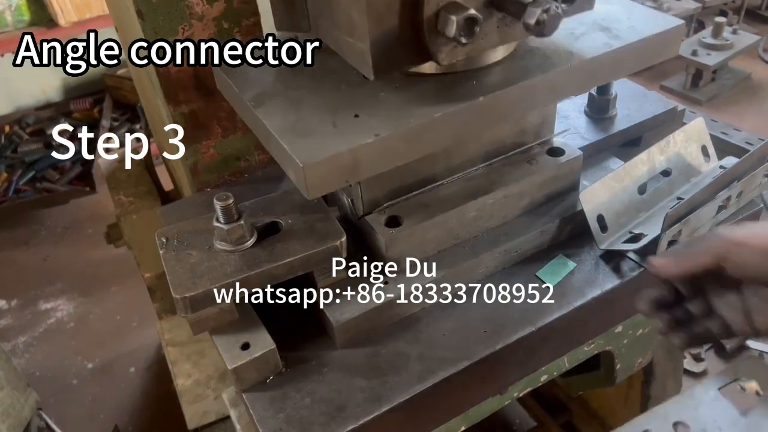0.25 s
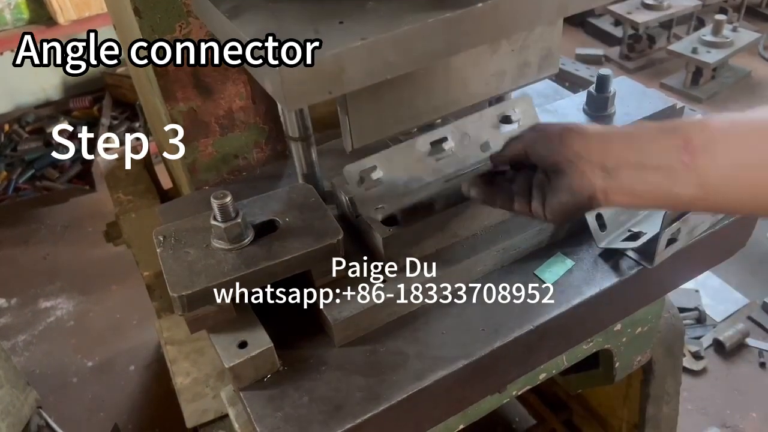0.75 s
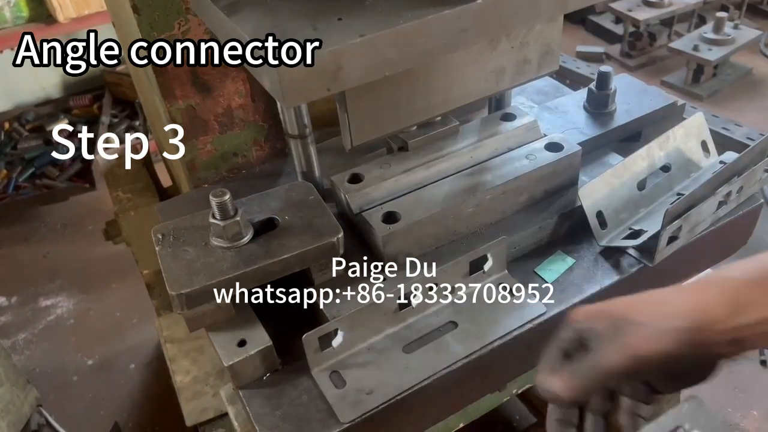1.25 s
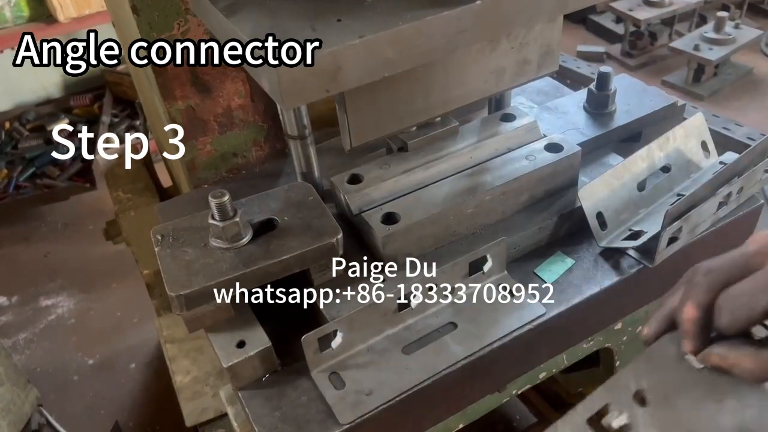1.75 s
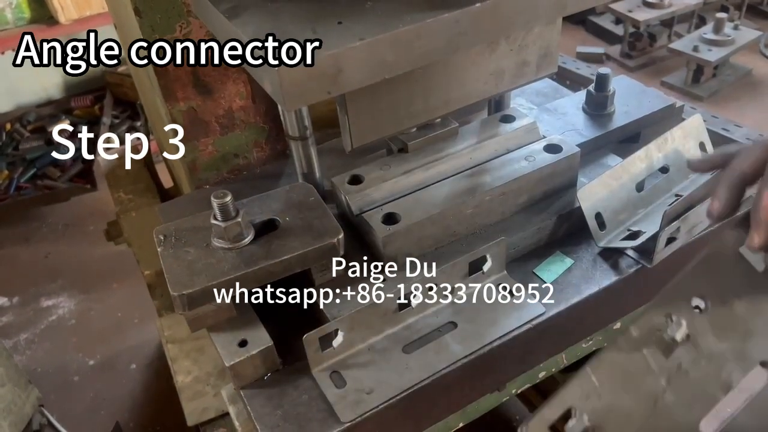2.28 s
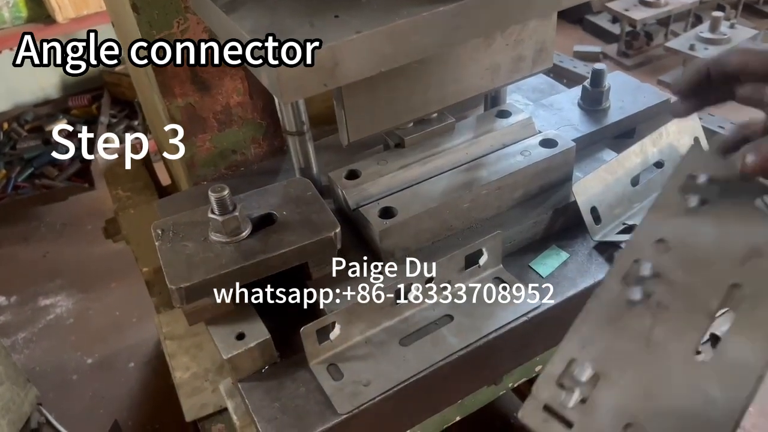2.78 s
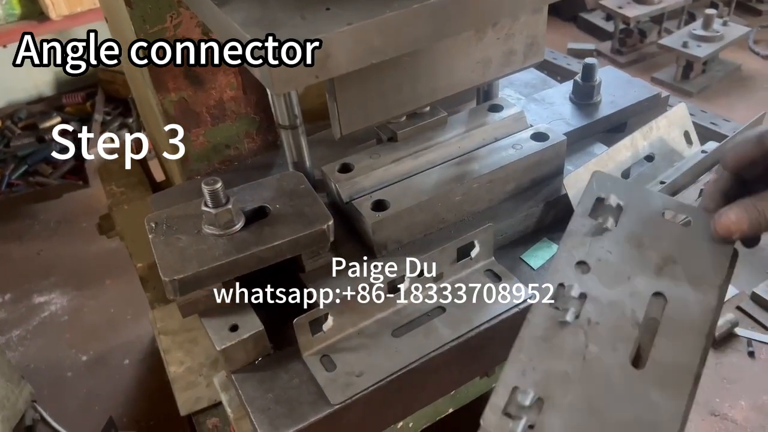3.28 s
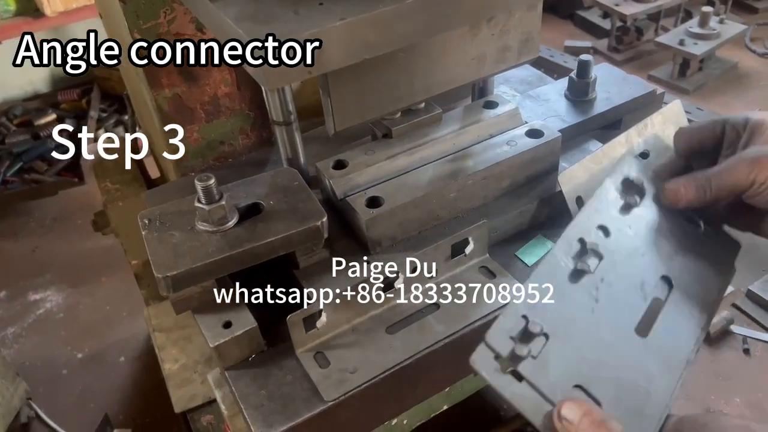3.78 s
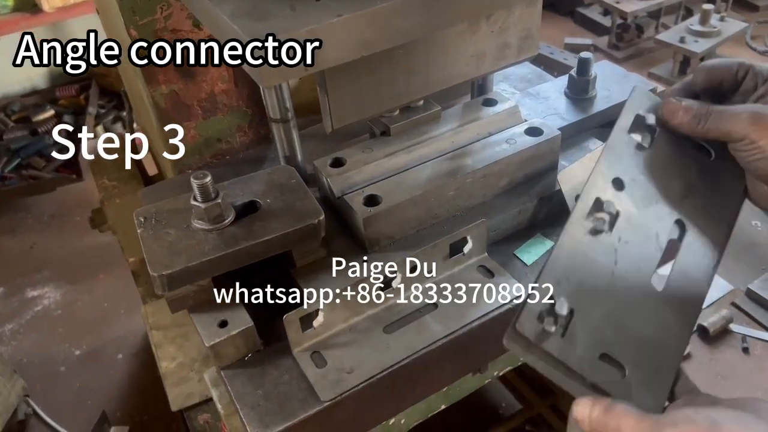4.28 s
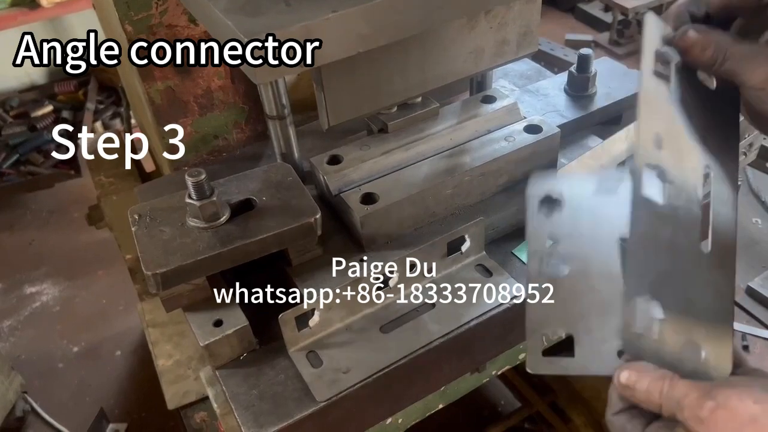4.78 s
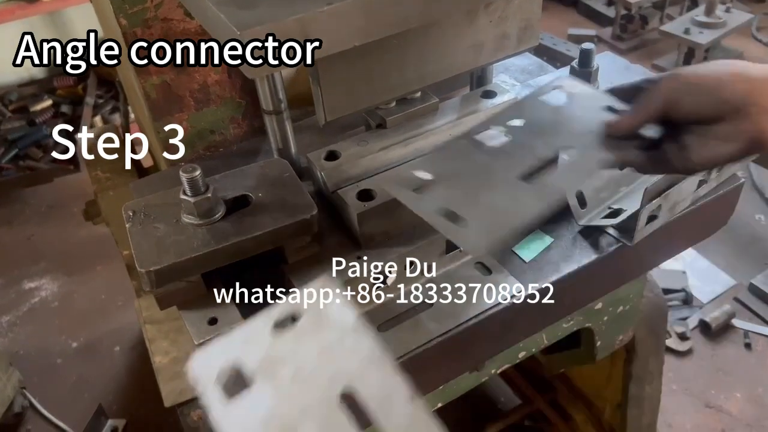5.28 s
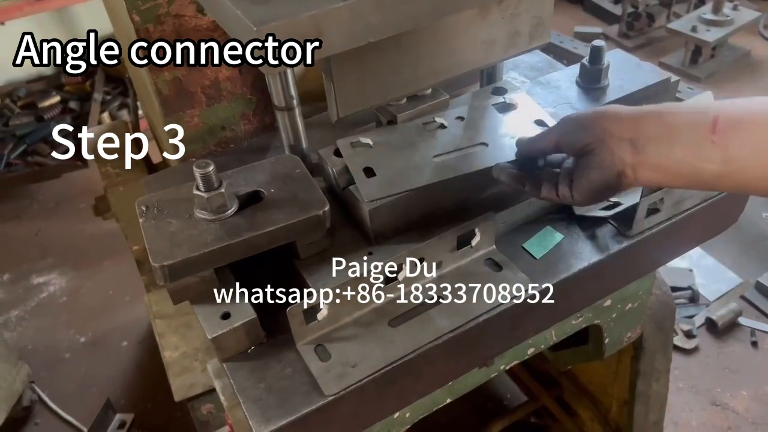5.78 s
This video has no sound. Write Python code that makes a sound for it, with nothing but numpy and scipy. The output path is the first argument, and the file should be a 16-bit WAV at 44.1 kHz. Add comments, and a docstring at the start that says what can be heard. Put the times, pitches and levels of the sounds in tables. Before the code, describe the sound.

Close to a punch press in a workshop, heavy thuds and steel cracks come first in quick succession as the ram opens. A bent part clinks sharply as it is set down. Then only irregular hollow gear knocks continue over motor hum and dull hall noise, with a few faint clinks, until a steel blank drops on the die, rattles, and scrapes briefly amid busier knocking.

```python
"""Idling punch press

A punch press idles in a workshop: loose gear teeth knock irregularly in its drive over motor hum and hall noise.
The ram thuds open, a bent part is lifted out and set down, and a steel blank is turned in the hands,
then dropped on the die and slid into place. Two spaced microphones listen close by.
Knocks, thuds and clinks are sums of dying tones; bangs, cracks, rubbing and hall are shaped noise;
the motor and some passing tones are wavering sines."""
import sys
import numpy as np
from scipy import signal
from scipy.fft import rfft, irfft
from scipy.io import wavfile
from scipy.ndimage import uniform_filter1d

SR = 44100
rng = np.random.default_rng(int(sys.argv[2]) if len(sys.argv) > 2 else 0)


def inscribe(sig):
    """Save sig as 16-bit PCM at rate SR to the path in sys.argv[1].

    A 1-D sig is mono; a 2-D sig holds one channel per row.
    Samples are clipped to [-1, 1] before scaling.
    """
    pcm = np.round(np.clip(np.atleast_2d(sig).T, -1, 1) * 32767)
    wavfile.write(sys.argv[1], SR, pcm.astype(np.int16))


N = 266364  # length in samples

# each microphone's share of a left-right difference: left, right
SIDES = np.array([[.5], [-.5]])
FLUTTER_DB, FLUTTER_PER_S = 3, 160  # struck modes flutter in level


def gain_of(db):
    """Turns decibels into a factor on the wave."""
    return 10 ** (np.asarray(db) / 20)


def evened(x):
    """Scales a sound to an rms of 1."""
    return x / np.sqrt(np.mean(x ** 2) + 1e-20)


def read(points, hz):
    """Reads a curve between its listed points, along a logarithmic frequency scale."""
    f, value = np.transpose(points)
    return np.interp(np.log(hz + 1), np.log(f + 1), value)


def add(mix, s, sound):
    """Adds a stereo sound to the mix from second s on, cut off at the end."""
    part = mix[:, round(s * SR):][:, :sound.shape[1]]
    part += sound[:, :part.shape[1]]


def coloured(x, db_of):
    """Filters x by a gain in dB given as a function of frequency."""
    hz = np.fft.rfftfreq(x.shape[-1], 1 / SR)
    return irfft(rfft(x) * gain_of(db_of(hz)), x.shape[-1])


def wander(rate):
    """A random line through normally spread points, rate of them per second."""
    points = int(N / SR * rate) + 2
    return np.interp(np.linspace(0, points - 1, N), np.arange(points), rng.standard_normal(points))


def jagged(hz, depth_db, width):
    """The dense overtones of sheet steel: a random comb of peaks about width Hz wide."""
    points = rng.standard_normal(int(SR / 2 / width) + 2)
    return depth_db * np.interp(hz / width, np.arange(len(points)), points)


def mode(push, hz, t60):
    """One complex resonance: a unit click leaves a ring of height 1."""
    step = (2j * np.pi * hz - np.log(1000) / t60) / SR
    return signal.lfilter([1], [1, -np.exp(step)], push)


def apart(x, other, lag, share):
    """The right microphone hears x lag samples later; reflections add a share of unrelated sound."""
    share = np.clip(share, 0, 1)
    right = np.sqrt(1 - share ** 2) * np.roll(x, lag) + share * other
    return np.array([x, right])


def struck(modes, stretch, rise, spacing_hz, flutter_db):
    """A blow on an object: each mode starts at its own phase, heard at another phase by each microphone."""
    hz, db, t60 = np.transpose(modes)[:, :, None]
    t = np.arange(SR // 3) / SR
    start, lead, spread = rng.standard_normal((3, len(modes), 1))
    knots = rng.standard_normal((len(modes), FLUTTER_PER_S // 3 + 2))
    flutter = np.array([np.interp(t * FLUTTER_PER_S, np.arange(len(row)), row) for row in knots])
    turn = 2 * np.pi * hz * t + 3 * start
    shift = np.sign(lead) * np.minimum(hz / spacing_hz, .8)
    dying = gain_of(db + 1.2 * spread + flutter_db * flutter - 60 * t / (t60 * stretch))
    left = (dying * np.cos(turn + shift)).sum(0)
    right = (dying * np.cos(turn - shift)).sum(0)
    total = np.sqrt(np.sum(gain_of(db) ** 2))
    return np.array([left, right]) * (1 - np.exp(-t / rise)) / total


def burst(db_of, t60, rise, lag, share):
    """A dying puff of coloured noise."""
    t = np.arange(SR // 3) / SR
    noise, other = evened(coloured(rng.standard_normal((2, len(t))), db_of))
    return apart(noise, other, lag, share) * gain_of(-60 * t / t60) * (1 - np.exp(-t / rise))


# colour of the hall noise, taken relative to 4 kHz: (f/Hz, level/dB)
HALL_COLOUR = [(12, -35), (30, -14.5), (134, -15), (211, -12.5), (594, -15.5), (855, -3.5), (1160, -15.5),
               (1630, -14.5), (2200, -19), (6600, -29), (8700, -38), (12000, -48.5), (16200, -51)]
# the noise swells as other machines work: (t/s, level of a 4 kHz bin before drift/dB, extra rumble/dB)
HALL_SWELL = [(0, -61.5, 11), (.4, -63.5, 11.5), (1.199, -68, -2), (1.6, -69.5, 2.5), (3.2, -69.5, 3.5),
              (3.7, -68, 5), (4.8, -66.5, 6.5), (5.4, -66, 5), (6.04, -63, 4)]
# how alike the hall is at both microphones: (f/Hz, likeness from 0 to 1)
HALL_LIKENESS = [(60, 1), (180, 0.98), (550, 0.085), (1650, 0.052), (15000, 0.0072)]
# how much louder the hall is on the left than on the right: (f/Hz, level/dB)
HALL_LEFT = [(60, 3.5), (200, 1), (500, 2), (1300, 7), (2400, -5), (6000, 7), (15000, -4)]


def hall():
    """Random short-time spectra with drifting patches; bass alike at both microphones."""
    frames, hz = N // 256 + 5, np.fft.rfftfreq(1024, 1 / SR)
    a, b, c, d, patches = rng.standard_normal((frames, 513, 5)).T
    patches = evened(uniform_filter1d(uniform_filter1d(patches, 10, 0), 10, 1))
    same = np.clip(read(HALL_LIKENESS, hz), -1, 1)[:, None]
    left = a + 1j * b
    right = same * left + np.sqrt(1 - same ** 2) * (c + 1j * d)
    s, db, rumble_db = np.transpose(HALL_SWELL)
    t = np.arange(frames) * 256 / SR
    shape_db = read(HALL_COLOUR, hz) - read(HALL_COLOUR, np.array([4000.]))
    # the rumble fades out above about 600 Hz
    level_db = np.interp(t, s, db) + np.interp(t, s, rumble_db) / (1 + (hz[:, None] / 600) ** 2)
    side_db = SIDES[:, :, None] * read(HALL_LEFT, hz)[:, None]
    spectra = np.array([left, right]) * gain_of(shape_db[:, None] + level_db + 2.2 * patches + side_db)
    return signal.istft(spectra, nperseg=1024, noverlap=768)[1][:, :N]


# steady motor and gear mesh tones: (f/Hz, rms level before wavering/dB)
MOTOR_TONES = [(137, -58), (204, -59.5), (1000, -53.5), (1082, -59), (1165, -57), (1500, -63.5)]


def motor():
    """Steady tones that waver in level and phase, differently at each microphone."""
    t, out = np.arange(N) / SR, np.zeros((2, N))
    for hz, db in MOTOR_TONES:
        lead = min(hz / 900, 1.5) * wander(3.4)
        waver_db = 3.0 * wander(5.5)
        phase = 2 * np.pi * hz * t + 0.9 * wander(6.0) + SIDES * lead
        out += np.sqrt(2) * gain_of(db + waver_db) * np.sin(phase)
    return out


# steel on steel: (t/s, crack level/dB, ring relative to crack/dB, crack t60/s, crack brightness/dB per octave,
# ring brightness/dB per octave, time it rings freely/s, which piece as numbered in PIECES)
CLINKS = [(0.034, -8.5, -14, 0.062, 5.5, 9, .1, 3), (.096, -17, -3, 0.13, -1.5, 0, .1, 3),
          (.262, -22, -28, 0.21, -5, 15, 0.11, 3), (.581, -10.5, -12, 0.072, 0.5, -2, .03, 3),
          (1.000, -31, -3, .046, 2, -2, .02, 0), (1.011, -11.5, 0, 0.031, 1.5, 1.5, 0.0096, 0),
          (1.027, -9.5, -5, 0.019, 5.5, -1, 0.0047, 0), (1.031, -22.5, 7, 0.12, 4.5, 6.5, 0.055, 0),
          (1.163, -41, 3, .04, 10, 4, .02, 0), (1.175, -31, -2.5, 0.07, 8, 8, 0.026, 0),
          (2.490, -31.5, -11.5, 0.13, 2, 4, .06, 1), (4.143, -22, -28, 0.049, 3.5, 3, .06, 1),
          (4.638, -31.5, -3, 0.097, 3, -7, 0.046, 0), (4.715, -36, -4, 0.14, 5, -1, .05, 0),
          (5.404, -16, -5.5, 0.078, 4, 0.5, 0.082, 1), (5.57, -13, 1.5, 0.065, 5, -1.5, 0.045, 2),
          (5.586, -19.5, 3.5, .04, 3, 7, 0.029, 2), (5.607, -20, 3.5, 0.051, -3, -5, 0.015, 2),
          (5.626, -16, -7, 0.047, 5, 9, 0.027, 2), (5.863, -31, 0.5, 0.026, 7, -6, .04, 2),
          (5.915, -40, -8, .04, 12, 2, .02, 2), (5.930, -26, -1.5, 0.042, -2.5, -23, 0.0076, 2)]
# what each piece rings with, (f/Hz, level/dB, t60 before shortening or stretching/s):
# 0 the bent part, 1 the blank held, 2 the blank lying on the die, 3 the die
PIECES = [
    [(1900, -7, .15), (2380, -2, .07), (2500, 2, .035), (2625, -3, .2), (2850, -6, .1), (3068, -5, .4),
     (3198, 0, .45), (3330, -4, .3), (3480, -3, .25), (3714, 0, .06), (3822, -12, .35), (4975, -8, .2),
     (5150, -10, .12), (5350, -6, .18), (5400, -5, .05), (6013, -4, .3), (6815, -18, .1), (8231, -7, .05),
     (8834, -20, .3), (9512, -12, .04), (12050, -13, .05)],
    [(2090, 2, .3), (2160, -6, .3), (2300, -9, .15), (2650, -8, .2), (2907, -6, .18), (3300, -9, .12),
     (3560, -5, .18), (3774, -6, .14), (4893, -13, .15), (6455, -10, .12), (7084, -16, .1),
     (8150, -18, .09), (11640, -13, .05), (14350, -22, .08)],
    [(1735, 0, .13), (2100, -8, .15), (2480, -8, .15), (2300, -9, .1), (2752, -3, .13), (3000, -10, .1),
     (3240, -9, .12), (3540, -11, .1), (3790, -10, .14), (4748, -8, .12), (4900, -11, .1), (5280, -9, .12),
     (5652, -7, .13), (5822, -8, .13), (6224, -6, .13), (6630, -7, .11), (7070, -10, .11), (8570, -11, .09),
     (9360, -12, .09), (12190, -12, .05), (13040, -14, .06), (15406, -14, .05)],
    [(1600, -2, .07), (2030, -2, .06), (2300, -3, .06), (3500, -7, .04), (4000, -6, .04), (4700, -6, .04),
     (6250, -1, .05), (6900, -6, .04)],
]
# how each piece is struck: (crack rise/s, left-right difference/dB, ring length factor)
PIECE_CONTACT = [(0.0044, 2, 0.87), (0.0037, -1, 1.55), (0.0033, -2.5, 1.7), (0.0036, 2, 1.4)]
# colour of a crack before its brightness tilt: (f/Hz, level/dB per Hz)
CRACK_COLOUR = [(400, -12.5), (1000, -7.5), (2000, -4), (4000, -10.5), (8000, -20), (16000, -32.5)]
# first touch of each clink: (level relative to the crack/dB, t60/s, extra brightness/dB per octave)
FIRST_TOUCH = (0.6, 0.0071, 4.1)
# sheet steel rubbing on steel and hands: (start t/s, hold/s, level before unsteadiness/dB)
RUB_STROKES = [(4.475, .005, -46), (4.641, .005, -47), (4.713, 0.0059, -43), (5.406, 0.0041, -32.5),
               (5.449, 0.06, -33.5), (5.565, 0.092, -24.5), (5.684, 0.22, -45.5), (5.906, 0.011, -40)]
# colour of the rubbing: (f/Hz, level/dB per Hz)
RUB_COLOUR = [(600, -13), (1500, -0.5), (3000, -1.5), (6000, -9.5), (9000, -3.5), (12000, -6.5),
              (16000, -12)]
LANDED = round(5.56 * SR)  # sample from which the blank lies on the die
STROKE_RISE_DB_PER_S, STROKE_FADE_DB_PER_S = 800, 404
SETTLE_DB_PER_S = 2200  # extra fade of a ring once hand or bed grips the piece
SHEET_DB = 3  # how far the overtones of a crack stand out
RUBBED = .4  # a piece in sliding contact has its t60 shortened by this factor


def clink(db, ring_db, t60, bright_db, tilt_db, free, piece):
    """Steel hits steel: a first touch and a noisy crack, and a ring that is damped once the piece is gripped."""
    rise, left_db, stretch = PIECE_CONTACT[piece]
    touch_db, touch_t60, touch_bright_db = FIRST_TOUCH

    def crack_colour(hz):
        tilt = bright_db * np.log2((hz + 1) / 4000)
        return read(CRACK_COLOUR, hz) + tilt + jagged(hz, SHEET_DB, 247.7)

    def touch_colour(hz):
        return read(CRACK_COLOUR, hz) + (bright_db + touch_bright_db) * np.log2((hz + 1) / 4000)

    crack = burst(crack_colour, t60, rise, lag=5, share=0.97)
    touch = burst(touch_colour, touch_t60, rise, lag=5, share=0.25)
    crack = crack + gain_of(touch_db) * touch
    modes = [(f, d + tilt_db * np.log2(f / 4000), ringing) for f, d, ringing in PIECES[piece]]
    # a loose piece rocks on its bed, so each mode flutters
    ring = struck(modes, stretch, rise=0.00018, spacing_hz=2810, flutter_db=FLUTTER_DB)
    t = np.arange(ring.shape[1]) / SR
    ring = gain_of(ring_db) * ring * gain_of(-SETTLE_DB_PER_S * np.maximum(t - free, 0))
    return gain_of(db + left_db * SIDES) * (crack + ring)


def rubbing():
    """Sliding steel makes grainy noise, which also excites the modes of the blank."""
    t = np.arange(N) / SR
    start, hold, db = np.transpose(RUB_STROKES)[:, :, None]
    rising_db = STROKE_RISE_DB_PER_S * np.maximum(start - t, 0)
    fading_db = STROKE_FADE_DB_PER_S * np.maximum(t - start - hold, 0)
    stroke_db = (db - rising_db - fading_db).max(0)
    stroke = gain_of(stroke_db + 3.0 * wander(250.) + 1.2 * wander(45.))
    grit = rng.standard_normal((2, N))
    rub = stroke * evened(coloured(grit, lambda hz: read(RUB_COLOUR, hz) + jagged(hz, 4.6, 60)))
    out = apart(*rub, lag=7, share=0.78)
    held, lying = slice(round(4.4 * SR), LANDED), slice(LANDED, N)
    for piece, sounding, share_db in ((1, held, -30), (2, lying, -27.5)):
        for hz, db, t60 in PIECES[piece]:
            catching = gain_of(3.5 * wander(90.)[sounding])  # each mode catches the rubbing by turns
            ring = mode((stroke * grit[0])[sounding] * catching, hz, t60 * RUBBED)
            out[:, sounding] += gain_of(db + share_db) * (ring * np.exp(1.6j * SIDES)).real
    return out


def steel():
    """The parts and the die crack and ring as they touch, and the sheet rubs."""
    out = np.zeros((2, N))
    for s, *touch in CLINKS:
        add(out, s, clink(*touch))
    return out + rubbing()


# heavy blows in the press frame: (t/s, level/dB, ring length factor, bang relative to level/dB)
FRAME_THUDS = [(0.048, -9.5, 0.84, -0.5), (0.1, -10.5, 0.75, -0.5), (0.114, -9.5, 0.66, -5.5),
               (0.169, -19, 0.76, -29), (0.262, -20, 0.94, -2.5), (0.291, -17, 0.86, -8),
               (0.375, -16.5, 0.62, -10), (0.655, -28, 0.47, -15), (1.48, -43, 0.43, 12)]
# what the press frame rings with: (f/Hz, level/dB, t60 before the ring length factor/s)
FRAME_MODES = [(106, -4, 0.37), (130.7, -2.5, 0.24), (210.5, 2.5, 0.32), (258, -5, 0.33), (292, 9.5, 0.082),
               (351.6, 4.5, 0.41), (367.6, 4, 0.2), (448, -3, 0.22), (562.4, -7, 0.24), (684, 1.5, 0.17),
               (806, -2, 0.2), (892, -0.5, 0.41), (1193, -4, 0.25), (1460, -20, 0.15), (1550, -16, 0.077),
               (2060, -14, 0.16)]
# colour of the dull bang: (f/Hz, level/dB per Hz)
BANG_COLOUR = [(30, -47), (80, -6), (350, 5.5), (1000, -1), (2000, -1.5), (5000, -27), (12000, -39)]
SHUDDER_DB = 4.5  # loose joints make the frame's modes shudder in level


def press():
    """The ram and clutch strike the frame: low modes and a dull bang."""
    out = np.zeros((2, N))
    for s, db, stretch, bang_db in FRAME_THUDS:
        ring = struck(FRAME_MODES, stretch, rise=0.0097, spacing_hz=2590, flutter_db=SHUDDER_DB)
        bang = burst(lambda hz: read(BANG_COLOUR, hz), 0.17 * stretch, rise=0.0013, lag=6, share=0.35)
        add(out, s, gain_of(db) * ring)
        add(out, s, gain_of(db + bang_db) * bang)
    return out * gain_of(2.3 * SIDES)


CARRIED = 0.45  # share of the old ring that a new tooth contact leaves sounding


def knocked(s, level_db, lasting, modes, contact, early, chatter_db):
    """Soft blows into the modes, each muting part of the ring before it; between them a faint random chatter."""
    chatter = gain_of(chatter_db) * rng.standard_normal(N) * (rng.random(N) < .002)
    chance, out = rng.standard_normal((len(s), len(modes), 2)), np.zeros((2, N))
    at, n = np.round((s - early) * SR).astype(int), np.arange(round(contact * SR))
    # for every sample, the latest blow and the samples since it
    last = np.searchsorted(at, np.arange(at[0], N), "right") - 1
    since = np.arange(at[0], N) - at[last]
    for k, (hz, db, t60, lead) in enumerate(modes):
        blows = gain_of(level_db + 2.0 * chance[:, k, 0]) * np.exp(.5j * chance[:, k, 1])
        step = (2j * np.pi * hz - np.log(1000) / (t60 * lasting)) / SR
        left_overs = CARRIED * np.exp(step[:-1] * np.diff(at))
        for i, left_over in enumerate(left_overs):
            blows[i + 1] += left_over * blows[i]
        ring = mode(chatter, hz, t60)
        ring[at[0]:] += blows[last] * np.exp(step[last] * since)
        # the modes are in step past the middle of the contact, so the first beat is the strongest
        in_step = np.exp(2j * np.pi * hz * (n - .58 * len(n)) / SR)
        soft = np.hanning(len(n)) * in_step / len(n) * 2
        softened = signal.oaconvolve(ring, soft)[:N]
        out += (gain_of(db) * np.exp(1j * lead * SIDES) * softened).real
    return out


# gear teeth taking up slack, the knocks that stand out: (t/s, strength as a level/dB, ring length factor)
GEAR_KNOCKS = [(.378, -24, 1.9), (.501, -16, 1.3), (.531, -17.5, 1.7), (.567, -18, 1.2), (.577, -15, 0.38),
               (.647, -27, 0.5), (.782, -27, 2.7), (.976, -29, 0.35), (1.157, -32, 0.87),
               (1.2, -26.5, 0.95), (1.407, -18, 0.92), (1.641, -35.5, 1.1), (1.687, -40.5, 1.6),
               (1.782, -19, 0.65), (1.96, -33, 1.54), (2.171, -21, 0.66), (2.261, -21.5, 0.35),
               (2.316, -30.5, 0.96), (2.466, -23, 0.48), (2.491, -32.5, 2.3), (2.546, -24.5, 0.52),
               (2.6, -34.5, .9), (2.636, -26, 0.74), (2.745, -35, 0.83), (2.785, -32.5, 0.89),
               (2.863, -19.5, 0.71), (3.008, -29, 1.84), (3.184, -28, 0.19), (3.338, -26.5, 0.92),
               (3.404, -25.5, 0.77), (3.425, -22.5, 0.63), (3.458, -33, 0.83), (3.486, -20.5, 0.36),
               (3.566, -27.5, 0.56), (3.68, -23, 0.48), (3.777, -27, 1.7), (3.833, -27, 0.95),
               (3.885, -21.5, 0.87), (3.941, -26.5, 1), (3.977, -27.5, 2), (4.04, -25.5, 0.55),
               (4.154, -23.5, 0.51), (4.3, -24.5, 0.93), (4.39, -22.5, 0.29), (4.504, -19, 0.65),
               (4.667, -34, 0.7), (4.722, -30.5, 0.96), (4.847, -24, 0.55), (4.949, -43, 0.54),
               (5.035, -29.5, 0.76), (5.07, -27.5, 0.73), (5.133, -18.5, .8), (5.216, -25.5, 0.31),
               (5.328, -20.5, 0.53), (5.421, -13, 0.34), (5.532, -17.5, 0.56), (5.585, -20, 0.27),
               (5.645, -25, 0.27), (5.691, -33, 0.89), (5.744, -15.5, 0.71), (5.799, -22, 1.7),
               (5.82, -12.5, 0.22), (5.926, -20.5, 0.65), (5.947, -29, 0.67), (5.971, -18, 0.52)]
# drive housing, as main ring, upper ring and base:
# (f/Hz, level/dB, t60 before the ring length factor/s, left leads/rad)
HOUSING_MODES = [
    [(674, -21, 0.12, 1), (729.7, -14, 0.3, 1.23), (778, -12, 0.46, -1.36), (848.7, -2.5, 0.39, -1.06),
     (864, -8, 0.11, 0), (883, -5.5, 0.24, -0.5), (936, -11.5, 0.28, 2.5), (957, -13, 0.22, -1.5)],
    [(1302, -14, 0.11, 1.5), (1490, -8.5, 0.22, -1.5), (1583, -13.5, 0.12, -1), (1632, 0, 0.094, 1.54),
     (1730, -9.5, 0.29, -4), (2177, -11, 0.2, 2), (2585, -10.5, 0.13, 1.5)],
    [(77.5, -6.5, 0.17, .1), (108, -1.5, 0.18, .1), (133.7, -2, 0.26, .1), (205.6, -4.5, 0.37, 0.71),
     (355.2, -9.5, 0.21, 0.19)],
]
# how a knock reaches main ring, upper ring and base: (level at a usual knock/dB, share of the knock's strength
# that it follows, chance/dB, contact/s, lead before the listed time/s, chatter/dB, left-right difference/dB)
TOOTH_CONTACT = [(-21.5, 0.79, -0.5, .03, .016, -49.5, 0.5), (-34, 1, 1.5, 0.006486, 0.002912, -47.5, 1.5),
                 (-37, 0.73, 3, 0.02926, 0.0081, -48, 3)]
# brief bright knocks in the housing's upper ring, many together with gear knocks:
# (t/s, level before a 0.5 dB lift/dB)
UPPER_KNOCKS = [(1.4025, -20.5), (1.7804, -35), (1.9587, -33), (2.2431, -25), (2.5035, -33), (2.8625, -38),
                (2.931, -32), (3.4825, -35), (3.6788, -33), (3.882, -37), (4.1477, -37), (4.2999, -34),
                (4.4979, -31), (5.128, -29)]
USUAL_KNOCK_DB = -22


def drive():
    """Each gear knock rings the housing in two ranges and thumps through the base; bright knocks join on top."""
    s, level_db, lasting = np.transpose(GEAR_KNOCKS)
    out = np.zeros((2, N))
    for modes, way in zip(HOUSING_MODES, TOOTH_CONTACT):
        db, follow, chance_db, contact, early, chatter_db, left_db = way
        felt_db = db + follow * (level_db - USUAL_KNOCK_DB) + chance_db * rng.standard_normal(len(s))
        knocks = knocked(s, felt_db, lasting, modes, contact, early, chatter_db)
        out += gain_of(left_db * SIDES) * knocks
    upper = [m[:3] for m in HOUSING_MODES[1]]
    for at, db in UPPER_KNOCKS:
        bright = struck(upper, 0.47, rise=0.0036, spacing_hz=2000, flutter_db=FLUTTER_DB)
        add(out, at, gain_of(db + 0.5) * bright)
    return out


# tones that sing for a while and fade: (start t/s, end t/s, f/Hz, rms level before unsteadiness and fades/dB)
SINGING_TONES = [(0.4, 1.02, 1926, -47), (2.28, 2.88, 1003, -48), (0.38, 0.45, 1655, -36),
                 (0.54, 0.65, 1680, -35), (0.42, 0.43, 330, -40), (0.6, 0.768, 340, -40),
                 (1.2, 1.654, 248, -45.5), (4.805, 7.2, 81, -45)]


def singing():
    """Each tone is a sine that swells and fades with a slight unsteadiness."""
    out = np.zeros((2, N))
    for start, end, hz, db in SINGING_TONES:
        t = np.arange(0, end - start, 1 / SR)
        unsteady = evened(uniform_filter1d(rng.standard_normal(len(t)), 700))
        tone = np.sin(2 * np.pi * hz * t + .5 * unsteady + SIDES * min(hz / 1200, 1.5))
        swell = signal.windows.tukey(len(t), .4)
        add(out, start, np.sqrt(2) * gain_of(db + 2.4 * unsteady) * swell * tone)
    return out


# how long the room's echoes last: (f/Hz, t60/s)
ROOM_FADE = [(100, 0.42), (800, 0.49), (4000, 0.32), (12000, 0.16)]


def room(x):
    """Sparse echoes of random sign, one in every 20 samples, each band dying at its own speed."""
    taps = np.zeros((2, SR))
    at = np.arange(500, SR - 20, 20) + rng.integers(0, 20, (2, (SR - 501) // 20))
    np.put_along_axis(taps, at, rng.choice([-1., 1.], at.shape), 1)
    hz, t, z = signal.stft(taps, SR, nperseg=256)
    dying = gain_of(-60 * t / read(ROOM_FADE, hz)[:, None])
    tail = signal.istft(z * dying, SR, nperseg=256)[1]
    return signal.fftconvolve(x, tail / np.linalg.norm(tail[0]), axes=1)[:, :N]


def scene():
    """Adds the close sounds, their echoes in the room, the motor and the hall."""
    gears, ram, parts = drive(), press() + singing(), steel()
    echoes = room(gain_of(-16.0) * gears + gain_of(-14.0) * ram + gain_of(-16.0) * parts)
    return gears + ram + parts + echoes + motor() + hall()


EDGE_HZ = 15850  # upper band limit


def record(dry):
    """Microphone bass roll-off below about 25 Hz, then the band limit."""
    heard = coloured(dry, lambda hz: -10 * np.log10(1 + (25 / (hz + 1)) ** 4))
    low_pass = signal.firwin(511, EDGE_HZ, window=("kaiser", 9), fs=SR)
    return signal.oaconvolve(heard, low_pass[None], "same")


dry = scene()
out = record(dry)
inscribe(out)
```